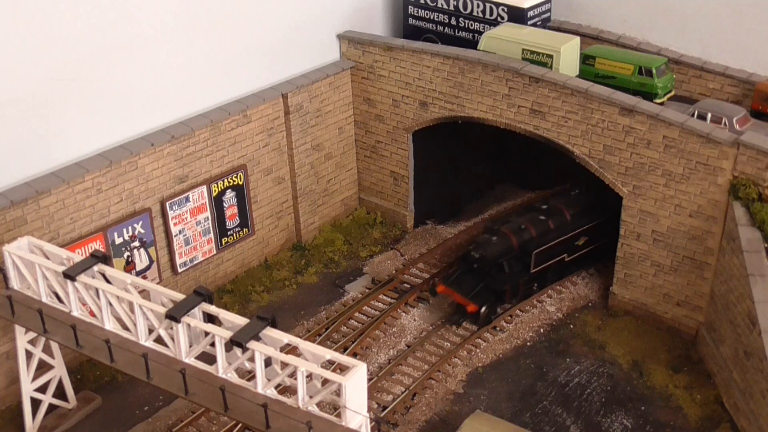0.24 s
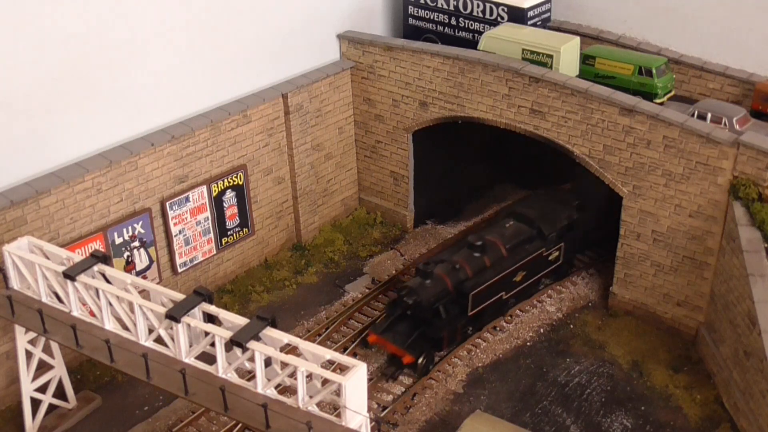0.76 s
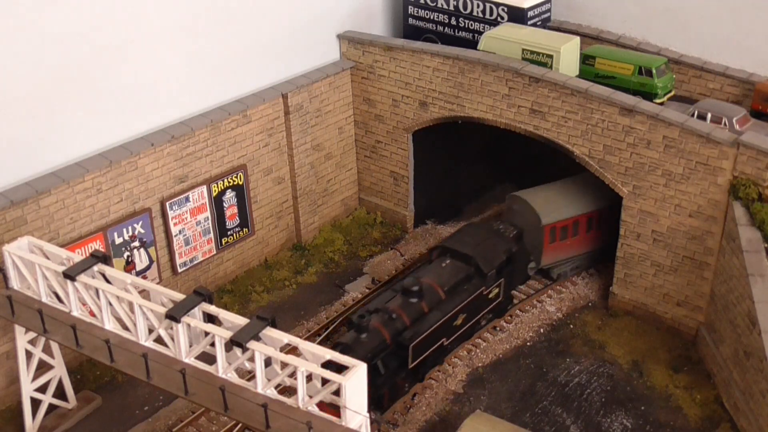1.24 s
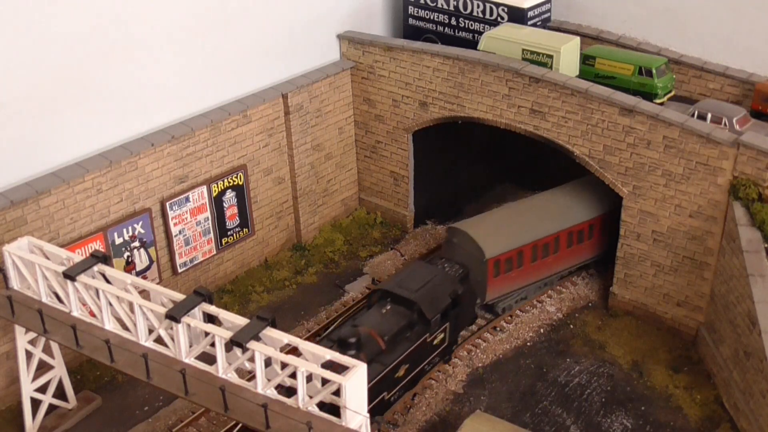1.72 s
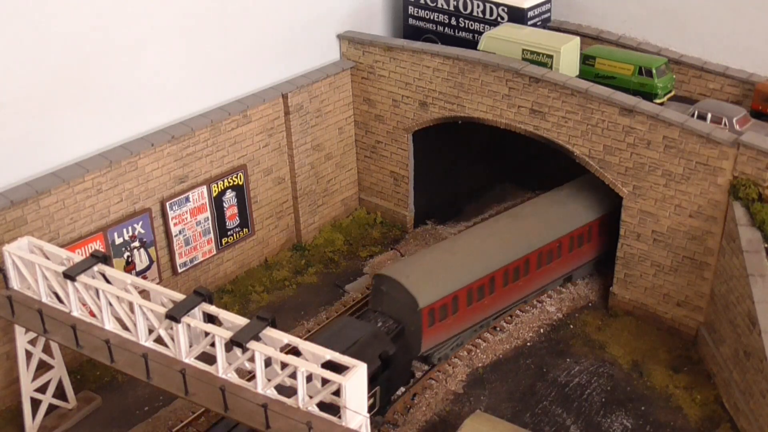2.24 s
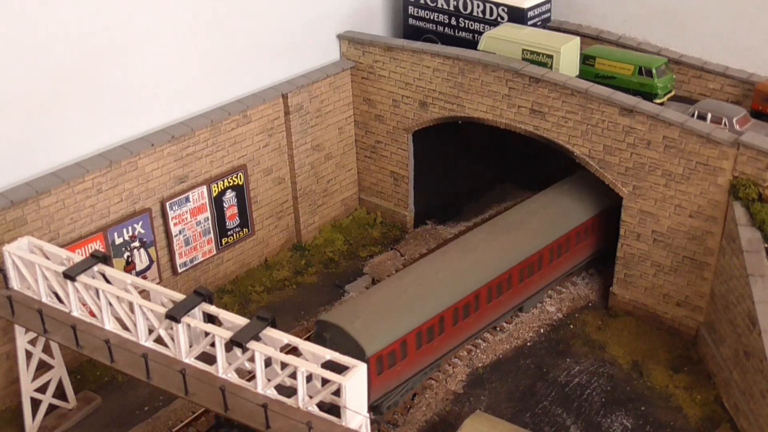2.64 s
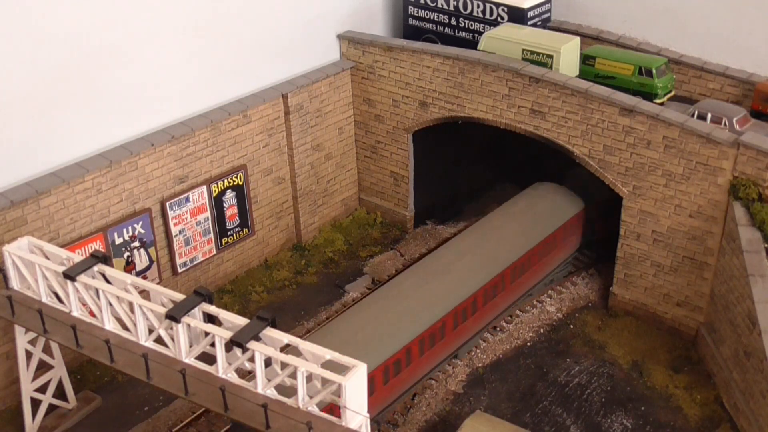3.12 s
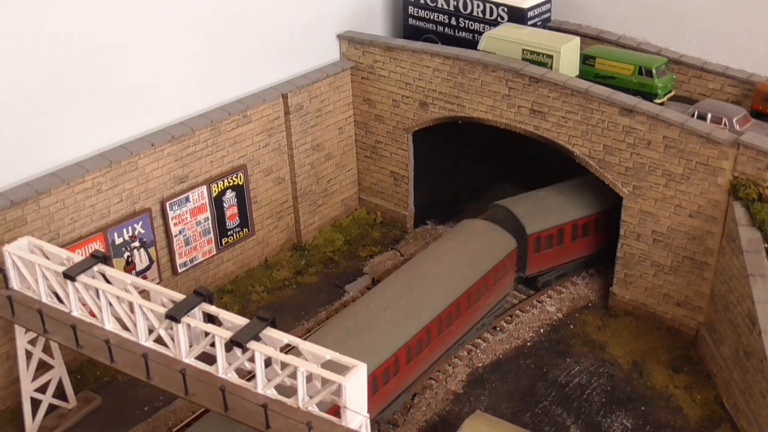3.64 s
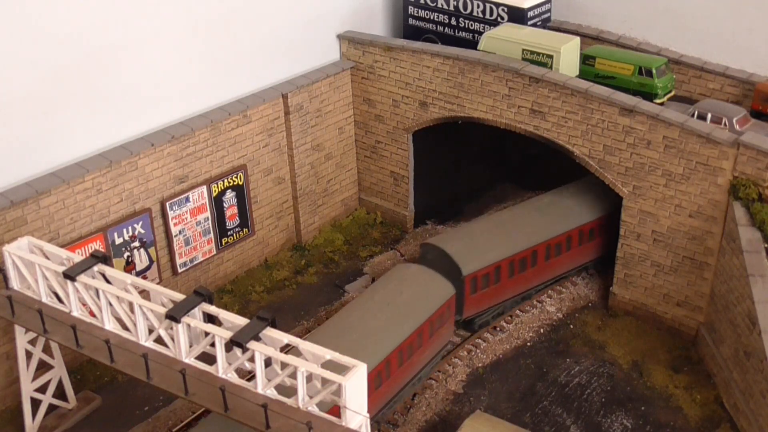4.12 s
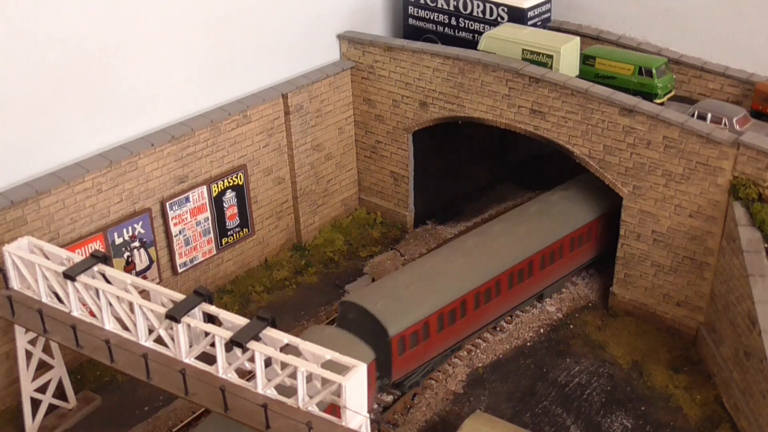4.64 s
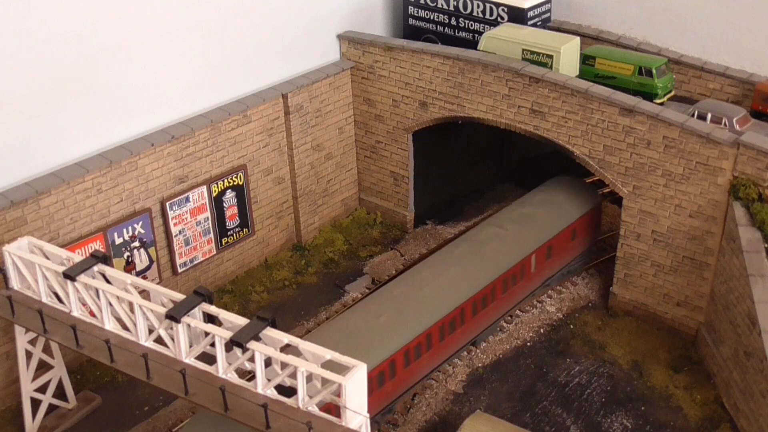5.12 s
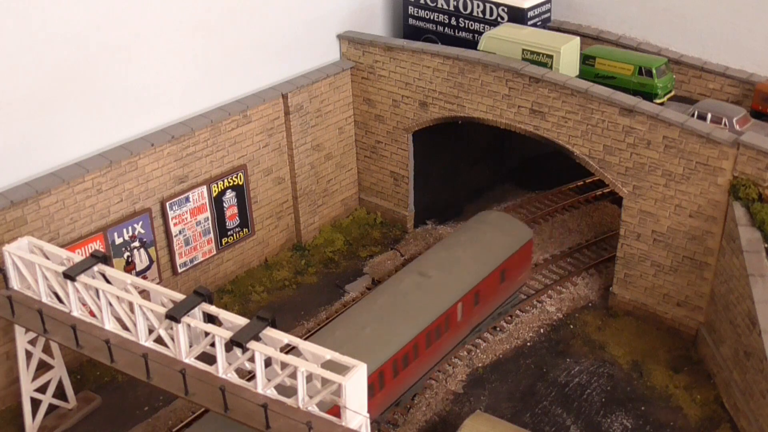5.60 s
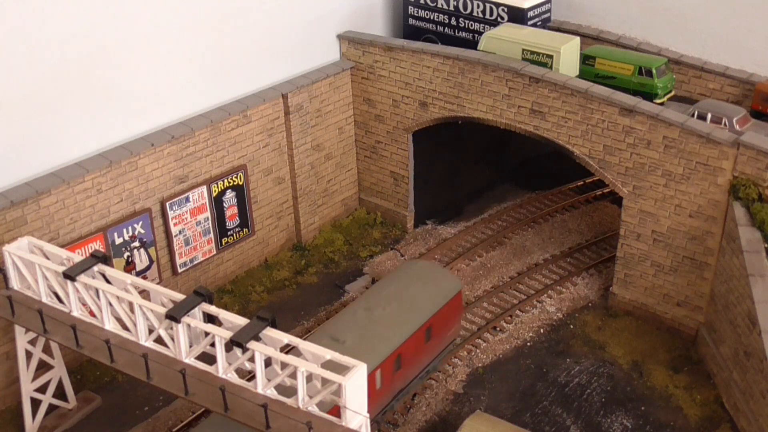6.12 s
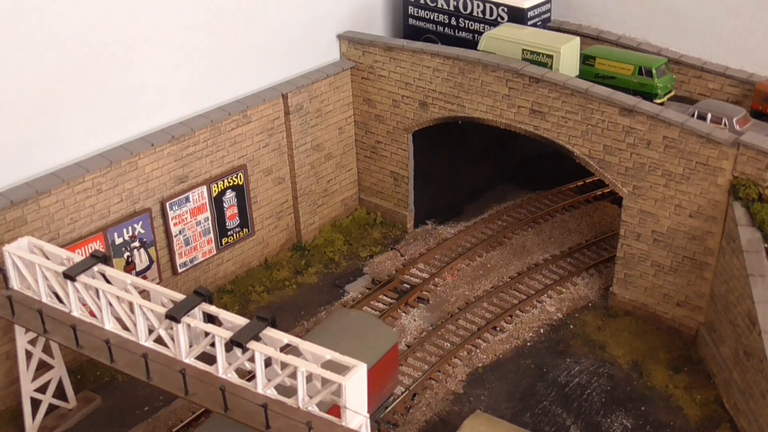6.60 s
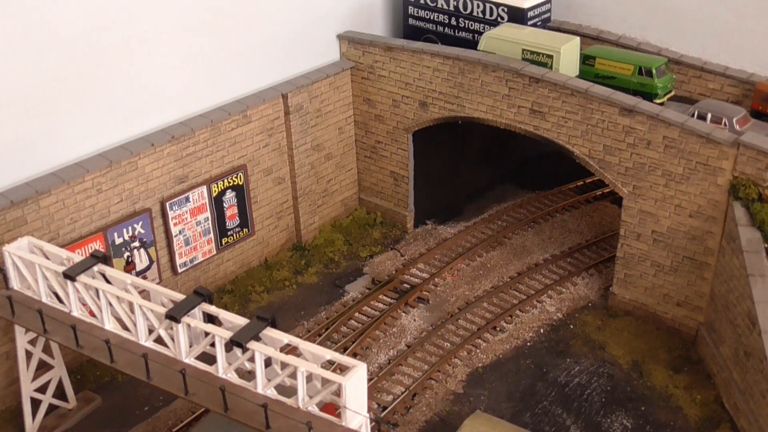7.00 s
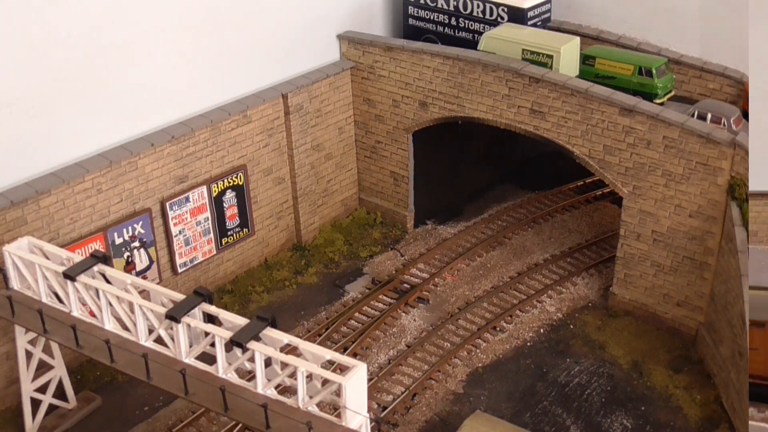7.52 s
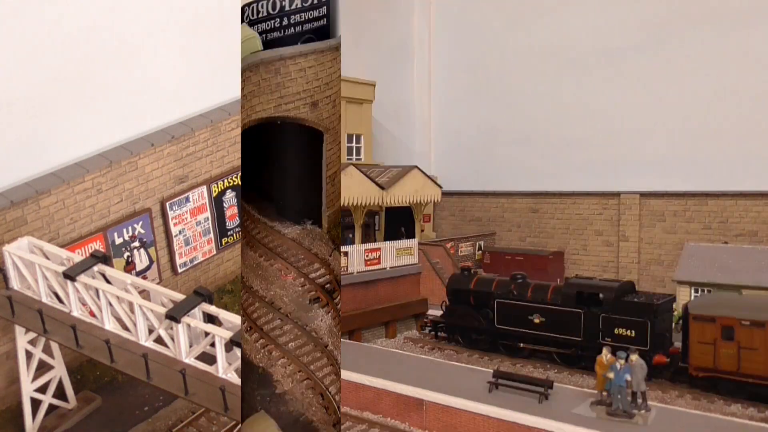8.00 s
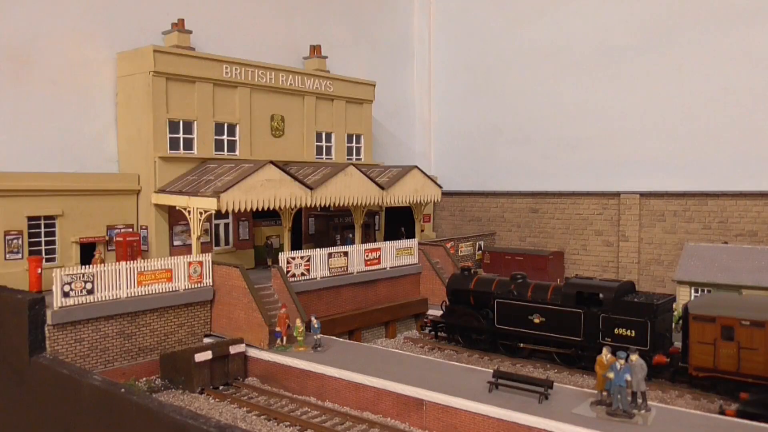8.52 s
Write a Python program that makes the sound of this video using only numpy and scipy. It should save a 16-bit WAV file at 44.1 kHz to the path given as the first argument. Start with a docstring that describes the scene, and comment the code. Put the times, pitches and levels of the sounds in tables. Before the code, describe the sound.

Close, dry sound of a miniature train on a hollow wooden layout. Wheels grit and hiss on the rails while the board hums and booms beneath. Clicks are few at first, then crowd into uneven rattling groups as the coaches roll by, strongest past the middle. The clatter continues after the train leaves view, then dissolves into a quiet room with soft electrical hum.

```python
"""A small electric model train rolls over points and rail joints, close to a camera microphone in a quiet room.
Rolling noise and blows drive damped baseboard modes, which boom; filtered noise, roughened by small
knocks and ringing parts, makes the rush and hiss of the wheels. Joints click as short noise bursts with
a brief note, narrow noise bands waver in the treble. At the end the scene crossfades into another
scene's quiet floor with a faint mains hum."""
import sys
import numpy as np
from scipy import signal
from scipy.fft import rfft, irfft, next_fast_len
from scipy.io import wavfile
from scipy.ndimage import uniform_filter1d

SR = 44100
rng = np.random.default_rng(int(sys.argv[2]) if len(sys.argv) > 2 else 0)


def wav_out(sig):
    """Save sig, one row per channel (or a flat mono array), as 16-bit PCM at SR to the path in sys.argv[1]."""
    wavfile.write(sys.argv[1], SR, np.round(np.clip(np.atleast_2d(sig).T, -1, 1) * 32767).astype(np.int16))


N = 385991

# Baseboard modes. Each row: frequency in Hz, relative level in dB, t60 in s under steady drive.
BOARD_MODES = [(74.5, -26, 0.46), (83.7, -14, 0.33), (110.3, -8.5, 0.22), (139, -38, 0.23),
               (162.8, -2.5, 0.25), (185.9, -2.5, 0.34), (197.3, -1, 0.44), (222.2, -6.5, 0.4),
               (235.7, -2, 0.59), (259.6, -1.5, 0.47), (289.2, -8.5, 0.56), (309.5, 1, 0.088),
               (363.7, -3.5, 0.76), (381.6, -4.5, 0.59), (460.6, -1, 0.36)]


def undb(db):
    """Decibels to gain."""
    return 10 ** (np.asarray(db, float) / 20)


def unit(x):
    """Scale to rms 1 over all channels."""
    return x / np.sqrt(np.mean(x ** 2))


def colour(x, table, share=1):
    """Filter by share of a (Hz, dB) table, joined by lines on a log frequency axis."""
    size = next_fast_len(N)
    hz, db = np.transpose(table)
    f = np.maximum(np.arange(size // 2 + 1) * SR / size, 1)
    gain = undb(share * np.interp(np.log(f), np.log(hz), db))
    return irfft(rfft(x, size) * gain, size)[..., :N]


def noise():
    """White noise for mid and an unrelated side."""
    return rng.standard_normal((2, N))


def walk(rate_hz):
    """Random levels held 1 / rate_hz and smoothed twice; spread near 1."""
    k = int(SR / rate_hz)
    steps = np.repeat(rng.standard_normal(N // k + 1), k)
    return 1.3 * uniform_filter1d(uniform_filter1d(steps, k), k)[:N]


def curve(t, table):
    """Columns of a table joined by straight lines in time."""
    s, *columns = np.transpose(table)
    return [np.interp(t, s, c) for c in columns]


def add(out, s, x):
    """Mix a short sound in at time s."""
    i = int(s * SR)
    out[:, i:i + x.shape[1]] += x[:, :N - i]


def mode(x, hz, t60_s):
    """One damped resonance; an impulse of 1 rings at amplitude 1."""
    pole = np.exp(2j * np.pi * hz / SR - np.log(1000) / (t60_s * SR))
    return signal.lfilter([1], [1, -pole], x).imag


def narrow(hz, width_hz):
    """Noise in one steep resonance whose centre may move: slow complex noise shifted up to hz."""
    pole = np.exp(-1.5 * np.pi * width_hz / SR)
    two_stages = [[1, 0, 0, 1, -2 * pole, pole ** 2]] * 2
    slow = signal.sosfilt(two_stages, noise() + 1j * noise())
    carrier = np.exp(2j * np.pi * np.cumsum(hz * np.ones(N)) / SR)
    return unit((slow * carrier).real)


def favour(hz, centre_hz):
    """Modes near the centre are driven hardest from a given place on the board."""
    spread_oct = 0.35
    return 0.4 + np.exp(-(np.log2(hz / centre_hz) / spread_oct) ** 2)


def board_boom(t, boom_db, centre_hz):
    """Rough rolling drives the baseboard modes; the deepest have a level of their own."""
    deep_below_hz = 125
    # Each row: time in s, level of the deepest modes in dB.
    deep_levels = [(0.0, -67), (0.29, -75), (0.51, -78), (2.33, -68), (3.17, -87), (4.3, -62), (4.78, -75),
                   (5.25, -67.5), (5.4, -69.5), (6.54, -71), (7.39, -65), (7.6, -79)]
    boom, deep = np.zeros((2, 2, N))
    for hz, db, t60_s in BOARD_MODES:
        ringing = undb(db + 1.9 * walk(5)) * unit(mode(noise(), hz, t60_s))
        if hz < deep_below_hz:
            deep += ringing
        else:
            boom += ringing * favour(hz, centre_hz)
    deep_db, = curve(t, deep_levels)
    return undb(boom_db) * unit(boom) + undb(deep_db) * unit(deep)


def rattle():
    """Gain that swells and dies within a few ms at random small knocks of couplings and axles."""
    knocks_per_s, least_db, scatter_db, swell_ms = 110, -3, 2.5, .9
    when, size = rng.random((int(knocks_per_s * N / SR), 2)).T
    hits = np.zeros(N)
    hits[(when * N).astype(int)] = undb(least_db + scatter_db * -np.log(1 - .98 * size))
    t = np.arange(SR // 50) / (SR * swell_ms / 1000)
    return signal.oaconvolve(hits, np.e * t * np.exp(-t))[:N]  # a lone swell peaks at its hit's size


def pings():
    """Loose small parts ring for a moment, each at its own pitch and place."""
    pings_per_s, t60_s, low_hz, high_hz, level_db = 420, .018, 500, 5200, -17
    out, t = np.zeros((2, N)), np.arange(SR // 40) / SR
    envelope = np.exp(-np.log(1000) * t / t60_s) * np.minimum(t * 1000, 1)
    for when, pitch, size, side in rng.random((int(pings_per_s * N / SR), 4)):
        hz = low_hz * (high_hz / low_hz) ** pitch
        ring = np.sin(2 * np.pi * hz * t) * envelope
        strength = -np.log(1 - .98 * size) * np.sqrt(hz)
        add(out, when * N / SR, strength * ring * np.array([[1], [2 * side - 1]]))
    return undb(level_db) * unit(out)


def unrest(clicks):
    """The stock rattles on for a while after a joint: smoothed click power as a gain, 1 when calm."""
    decay_ms, share = 10.8, 0.26
    keep = np.exp(-1000 / (decay_ms * SR))
    power = signal.lfilter([1], [1, -keep], clicks[0] ** 2)
    return 1 + share * np.sqrt(power / power.mean())


def bogies(db, shake, parts):
    """Bogie frames: the lower rolling noise, lightly roughened."""
    # Each row: frequency in Hz, relative density in dB per Hz.
    spectrum = [(250, -23.5), (340, -0.5), (460, 7), (680, 3), (850, -3), (1300, -6), (2000, -31.5)]
    rough = noise() * (1 + .3 * shake) + parts / 2
    return undb(db + .6 * walk(14)) * unit(colour(rough, spectrum))


def coaches(db, shaken, shake, parts):
    """Hollow coach bodies turn rolling noise into a rush."""
    # Each row: frequency in Hz, relative density in dB per Hz.
    spectrum = [(400, -26), (650, -8.5), (810, -1.5), (1010, -4), (1360, -4), (1550, -7.5), (1750, -18),
                (2600, -38)]
    rough = shaken * noise() * (1 + .4 * shake) + parts
    return undb(db + .8 * walk(8)) * unit(colour(rough, spectrum))


def treads(db, shaken, shake, parts):
    """Wheel treads grit on the rail, strongly roughened by the knocks."""
    # Each row: frequency in Hz, relative density in dB per Hz.
    spectrum = [(940, -40), (1600, -29), (1730, -8), (2110, -2.5), (2730, -10.5), (3440, -7.5),
                (4220, -8.5), (6200, -20), (8060, -18.5), (13600, -120)]
    rough = shaken * noise() * (1 + .8 * shake) + parts
    return undb(db + .8 * walk(9)) * unit(colour(rough, spectrum))


def rail_hiss(t, shaken, shake):
    """Metal on metal hisses with slow swells and sinks as the locomotive leaves."""
    start_db, swell_db, loco_leaves_s, sink_db_per_s = -69.5, .8, 4, 2
    # Each row: frequency in Hz, relative density in dB per Hz.
    spectrum = [(3410, -93), (5800, -47), (6460, -29), (7400, -12), (7650, 0), (8590, 13.5), (10600, 12),
                (14200, -5), (14700, -19), (15600, -65)]
    db = start_db + swell_db * walk(5.03) - sink_db_per_s * np.maximum(t - loco_leaves_s, 0)
    rough = shaken * noise() * (1 + .85 * shake)
    return undb(db + .8 * walk(9)) * unit(colour(rough, spectrum))


def treble_bands(t, scuff_db):
    """Thin rail tone, wheel rims, flange scuff and top hiss: noise bands wavering in pitch and level."""
    rim_start_db, rim_leaves_s, rim_sink_db_per_s = -79.5, 6.2, 9
    # Rail tone, rims, scuff, top hiss. Each row: mean centre in Hz, width in Hz.
    bands = [(7620, 130), (10600, 500), (5700, 1300), (13000, 2600)]
    # Each row: time in s, mean level of the rail tone in dB.
    rail_levels = [(0.0, -84), (0.98, -85), (1.16, -73), (1.57, -84), (2.4, -77), (3.09, -75), (3.78, -78),
                   (4.31, -71), (4.6, -73), (5.1, -81), (5.4, -95)]
    # Each row: time in s, mean level of the hiss near 13 kHz in dB.
    top_levels = [(0, -91), (1.5, -84), (2.6, -77), (3.4, -77), (5, -88)]
    rim_db = rim_start_db - rim_sink_db_per_s * np.maximum(t - rim_leaves_s, 0)
    levels_db = curve(t, rail_levels)[0], rim_db, scuff_db, curve(t, top_levels)[0]
    out = np.zeros((2, N))
    for db, (hz, width_hz) in zip(levels_db, bands):
        gain = undb(db + 2 * walk(25) + 1.5 * walk(4))
        out += gain * narrow(hz + .25 * width_hz * walk(3), width_hz)
    return out


def sizzle(t):
    """A band of noise near 8 kHz, wavering in pitch and level."""
    centre_hz, waver_hz, width_hz = 8000, 120, 600
    # Each row: time in s, mean level in dB.
    levels = [(0, -90), (.3, -86), (.4, -74), (.68, -74), (.8, -77), (1.07, -73), (1.9, -87), (2.5, -74),
              (3.06, -72), (3.66, -83), (4.2, -69.5), (4.7, -80), (5.3, -73), (5.9, -78), (6.5, -95)]
    db, = curve(t, levels)
    return undb(db + 2 * walk(25)) * narrow(centre_hz + waver_hz * walk(3), width_hz)


def room(t):
    """Steady room and microphone noise; the scene that is crossfaded in at the end adds its mains hum."""
    level_db, crossfade_s = -65, (7.6, 8.6)
    # Each row: frequency in Hz, relative density in dB per Hz.
    spectrum = [(20, -32.5), (55, -17), (85, -15), (119, -10.5), (202, -2.5), (260, -6.5), (453, -10),
                (1200, -20), (2280, -35), (4500, -37.5), (6040, -49), (7900, -36.5), (13500, -42),
                (15600, -47)]
    # Mains multiples in the last scene. Each row: frequency in Hz, rms level in dB after the crossfade.
    hum_tones = [(100, -74.5), (150.7, -72.5), (199.2, -68.5), (446.8, -78.5)]
    hum = np.zeros(N)
    for hz, db in hum_tones:
        hum += np.sqrt(2) * undb(db) * np.sin(2 * np.pi * (hz * t + rng.random()))
    return undb(level_db) * unit(colour(noise(), spectrum)) + hum * np.interp(t, crossfade_s, (0, 1))


def thud(db, centre_hz):
    """A blow sets the modes ringing nearly in step; it swells for a cycle and dies faster than the boom."""
    t = np.arange(SR // 5) / SR
    hz, mode_db, t60_s = np.array(BOARD_MODES).T[:, :, None]
    phase = 2.2 * rng.random((2, len(BOARD_MODES), 1))
    decay = np.exp(-np.log(1000) * t / (0.29 * t60_s))
    strength = undb(mode_db) * favour(hz, centre_hz) ** 2
    rings = strength * decay * np.sin(2 * np.pi * hz * t + phase)
    x = (1 - np.exp(-(t / 0.0048) ** 2)) * rings.sum(axis=1)
    return undb(db) * x / np.abs(x[0]).max()


def thuds():
    """Wheels dropping into gaps, felt through the board."""
    # Each row: start in s, peak level in dB, favoured frequency in Hz.
    blows = [(0.056, -45.5, 189), (0.325, -39.5, 215), (0.465, -39, 232), (0.549, -43, 208),
             (0.591, -42.5, 232), (0.642, -42, 235), (1.236, -38.5, 235), (2.407, -31.5, 248),
             (2.651, -31.5, 220), (3.655, -39.5, 187), (4.382, -36, 270), (4.401, -37, 278),
             (4.634, -37, 222), (5.271, -38, 178), (6.147, -35.5, 174), (7.209, -37, 174),
             (7.679, -38, 217), (8.153, -51, 190)]
    out = np.zeros((2, N))
    for s, db, hz in blows:
        add(out, s, thud(db, hz))
    return out


def burst(hz, width, decay_ms, echo_db, echo_ms, pitched):
    """A hard contact and a crack of noise round hz, with a fainter, longer echo and a short note."""
    rise_ms, contact_ms, contact_strength, peak = .55, .5, 1.76, 1.12
    ms = np.arange(SR // 16) / SR * 1000
    rise = 1 - np.exp(-(ms / rise_ms) ** 2)
    push = rng.standard_normal((2, len(ms)))
    push *= rise * (np.exp(-ms / decay_ms) + undb(echo_db) * np.exp(-ms / echo_ms))
    push[:, int(contact_ms * SR / 1000)] += contact_strength * np.sqrt(SR / hz)
    edges_hz = np.clip([hz / (1 + width), hz * (1 + width)], 50, .45 * SR)
    crack = signal.sosfilt(signal.butter(3, edges_hz, "band", fs=SR, output="sos"), push)
    note = mode(push, hz, np.log(1000) * decay_ms / 1000)
    both = crack / np.abs(crack[0]).max() + pitched * note / np.abs(note[0]).max()
    return peak * both / np.abs(both[0]).max()


def click(ring_db, knock_db, tick_db, ring_hz, knock_hz, tick_hz):
    """Plastic body knocks, wheel rings briefly, metal edge ticks."""
    # width as share of pitch, decay in ms, echo in dB, echo decay in ms, share of clear note
    knock = burst(knock_hz, .35, 3.2, -12, 12, .5)
    ring = burst(ring_hz, .7, 1.6, -16, 8, .35)
    tick = burst(tick_hz, .33, 1.3, -19, 7, .45)
    return undb(knock_db) * knock + undb(ring_db) * ring + undb(tick_db) * tick


def joints():
    """Distinct clicks of wheels at joints and points; the edge ticks at a random pitch each time."""
    tick_low_hz, tick_high_hz = 7600, 10400
    # Each row: start in s, relative levels of ring, body knock and tick in dB, ring in Hz, knock in Hz.
    clicks = [(0.1054, -54, -68, -53, 3540, 780), (0.37, -53, -58, -55, 1990, 690),
              (0.479, -53, -55, -54, 3560, 690), (0.827, -50, -56, -56, 2930, 1430),
              (1.057, -39, -36, -42, 2420, 1380), (1.1005, -51, -46, -43, 4170, 1020),
              (1.1992, -54, -50, -52, 2100, 790), (1.2398, -53, -48, -51, 1850, 1370),
              (1.362, -50, -40, -41, 2520, 1370), (1.383, -46, -42, -39, 2260, 1020),
              (1.526, -58, -55, -47, 1850, 690), (1.8315, -39, -38, -43, 1970, 1370),
              (1.909, -48, -48, -46, 2390, 1030), (1.919, -49, -46, -42, 4180, 1080),
              (1.9267, -46, -50, -54, 3460, 760), (2.156, -44, -44, -47, 3510, 990),
              (2.2065, -40, -37, -41, 2850, 1400), (2.212, -42, -47, -38, 2290, 1350),
              (2.225, -45, -46, -49, 2140, 1090), (2.2865, -51, -48, -48, 4490, 1060),
              (2.3867, -55, -62, -50, 3320, 1360), (2.4014, -47, -47, -47, 2210, 740),
              (2.4096, -47, -50, -49, 4380, 690), (2.6104, -49, -47, -41, 4120, 840),
              (2.646, -48, -38, -40, 3150, 980), (2.6526, -48, -43, -49, 3590, 690),
              (2.9445, -46, -44, -54, 1900, 1050), (2.9475, -37, -48, -44, 2010, 1110),
              (2.9624, -46, -41, -41, 3130, 1010), (3.032, -46, -47, -54, 3450, 930),
              (3.089, -49, -42, -47, 3380, 560), (3.366, -42, -38, -49, 3270, 1350),
              (3.3729, -41, -38, -51, 3760, 1130), (3.652, -42, -59, -48, 3050, 690),
              (3.665, -40, -36, -47, 3490, 900), (3.868, -46, -46, -58, 2140, 1000),
              (4.044, -42, -43, -56, 3320, 740), (4.089, -50, -44, -53, 2020, 1370),
              (4.172, -44, -48, -57, 2310, 1170), (4.358, -47, -45, -48, 4490, 1060),
              (4.379, -44, -49, -46, 3750, 1010), (4.401, -45, -43, -51, 2070, 1400),
              (4.48, -48, -41, -44, 4110, 560), (4.551, -40, -58, -46, 2290, 1060),
              (4.6325, -57, -46, -51, 2960, 760), (4.635, -52, -41, -58, 2400, 450),
              (4.7425, -36, -35, -44, 1850, 1010), (4.766, -44, -44, -55, 2090, 740),
              (4.786, -43, -46, -48, 2970, 1130), (4.809, -44, -42, -37, 1880, 760),
              (4.9003, -42, -54, -45, 2060, 790), (4.956, -43, -38, -52, 2000, 1070),
              (5.033, -44, -35, -43, 1850, 1150), (5.0391, -46, -40, -55, 3520, 950),
              (5.0705, -40, -41, -43, 3910, 1380), (5.102, -46, -39, -39, 4400, 1120),
              (5.1085, -39, -37, -37, 3400, 1410), (5.239, -46, -40, -55, 2560, 1120),
              (5.298, -45, -47, -48, 2030, 1230), (5.369, -45, -47, -60, 1990, 810),
              (5.43, -45, -43, -54, 4270, 790), (5.48, -40, -39, -43, 4260, 720),
              (5.5755, -42, -43, -54, 2030, 810), (5.688, -40, -52, -45, 3620, 1360),
              (5.7545, -43, -40, -44, 3450, 960), (5.7605, -52, -41, -53, 3850, 760),
              (5.8663, -49, -43, -62, 2060, 1270), (5.922, -47, -42, -53, 4230, 940),
              (6.09, -43, -46, -54, 3280, 1310), (6.104, -44, -38, -39, 3050, 1090),
              (6.1447, -41, -44, -49, 2110, 1440), (6.2564, -55, -43, -62, 1820, 830),
              (6.3845, -45, -53, -49, 4060, 860), (6.4167, -42, -45, -41, 2980, 1080),
              (6.4233, -40, -38, -43, 3770, 1390), (6.4356, -48, -41, -58, 3640, 1310),
              (6.4494, -43, -44, -51, 3230, 1210), (6.4599, -45, -43, -58, 2380, 1030),
              (6.4975, -50, -43, -58, 4220, 790), (6.575, -48, -47, -52, 1890, 810),
              (6.8195, -49, -46, -56, 3420, 800), (6.8475, -45, -39, -48, 1850, 870),
              (6.8528, -41, -41, -45, 1850, 860), (6.889, -44, -38, -51, 2110, 780),
              (7.027, -49, -44, -51, 2010, 1370), (7.08, -50, -52, -48, 3340, 760),
              (7.1624, -40, -37, -42, 3560, 870), (7.1995, -46, -42, -54, 2280, 810),
              (7.2037, -42, -42, -45, 3790, 1210), (7.214, -48, -57, -53, 4240, 1270),
              (7.255, -47, -46, -56, 3900, 800), (7.281, -49, -43, -60, 2270, 1380),
              (7.38, -45, -47, -46, 2350, 1120), (7.441, -43, -40, -50, 2140, 1210),
              (7.515, -42, -49, -50, 3280, 940), (7.5494, -48, -47, -56, 2030, 850),
              (7.5794, -50, -47, -54, 3600, 820), (7.737, -44, -45, -58, 2060, 1070),
              (7.858, -45, -46, -52, 2990, 1340), (7.9089, -49, -52, -56, 2600, 1040),
              (8.07, -52, -54, -63, 3200, 1360), (8.082, -53, -56, -62, 3750, 1030),
              (8.292, -62, -54, -70, 2020, 830), (8.354, -56, -61, -65, 2600, 990),
              (8.5195, -57, -64, -69, 2400, 1200)]
    out = np.zeros((2, N))
    for s, *sound in clicks:
        add(out, s, click(*sound, rng.uniform(tick_low_hz, tick_high_hz)))
    return out * [[1], [0.55]]  # a click comes from one spot, so less of it lies in the side


def train(t):
    """Bogies, treads and flanges follow the coach level; the crossfade takes the rolling out at the end."""
    crossfade_s, silent_s, bend = 7.6, 8.65, 1.32
    full_coach_db, mean_boom_db = -55, -46.5
    # Load on the baseboard. Each row: time in s, boom level in dB, favoured frequency in Hz.
    board_load = [(0.0, -53.5, 192), (0.36, -51, 213), (0.95, -51.5, 232), (1.29, -49, 222),
                  (1.67, -54.5, 217), (2.03, -49.5, 212), (2.07, -54, 252), (2.39, -49.5, 250),
                  (2.58, -47.5, 255), (2.67, -46, 230), (2.94, -49.5, 257), (3.12, -49, 234),
                  (3.25, -47, 239), (3.4, -49.5, 237), (3.6, -49, 224), (4.15, -51.5, 250),
                  (4.44, -48.5, 263), (4.89, -49.5, 234), (5.5, -49, 234), (6.67, -56.5, 227),
                  (7.32, -49, 225), (7.37, -50, 249), (7.6, -53, 220)]
    # Nearness of the coaches. Each row: time in s, mean rush level in dB.
    nearness = [(0.0, -65), (0.21, -67), (1.37, -57.5), (1.67, -60.5), (3.51, -54.5), (3.92, -54),
                (4.85, -53.5), (5.35, -53), (5.65, -51.5), (6.71, -56), (7.26, -53), (7.6, -54.5)]
    boom_db, centre_hz = curve(t, board_load)
    coach_db, = curve(t, nearness)
    rise_db = coach_db - full_coach_db
    bogie_db = -52.5 + 0.25 * rise_db + 0.55 * (boom_db - mean_boom_db)
    tread_db = -61 + 0.48 * rise_db
    scuff_db = -85 + 3.1 * rise_db

    clicks = joints()
    shaken = unrest(clicks)
    shake, parts = rattle() * shaken, pings()
    rolling = board_boom(t, boom_db, centre_hz)
    rolling += bogies(bogie_db, shake, parts)
    rolling += coaches(coach_db, shaken, shake, parts)
    rolling += treads(tread_db, shaken, shake, parts)
    rolling += rail_hiss(t, shaken, shake)
    rolling += treble_bands(t, scuff_db) + sizzle(t)
    fade_out = np.clip((silent_s - t) / (silent_s - crossfade_s), 0, 1) ** bend
    return fade_out * rolling + thuds() + clicks


def scene():
    """Sources in mid and side, spread by the width, lean and delay of the microphone pair."""
    left_leads_us = 18  # the train is a little nearer the left port
    # Bass cut, top fall and a dip of the camera body. Each row: frequency in Hz, gain in dB.
    mic = [(40, -48), (80, 2.5), (4500, -7), (6000, -8.5), (7500, -4.5), (13000, -4), (15600, -9)]
    # Stereo width. Each row: frequency in Hz, gain of the side in dB.
    width = [(30, 13), (60, -29), (110, -16), (200, -19.5), (380, -12), (700, -8.5), (1290, -7.5),
             (2380, -7.5), (4400, -6), (8120, -6.5), (15000, 0.5)]
    # Channel balance. Each row: frequency in Hz, left minus right gain in dB.
    lean = [(40, -5), (130, 2.5), (500, -1.5), (1200, 0.9), (8000, 1.1), (13000, -1)]
    t = np.arange(N) / SR
    mid, side = colour(train(t), mic) + room(t)
    # half the lead as slope times time, opposite in sign for the two channels
    side = colour(side, width) + np.gradient(mid) * left_leads_us * 1e-6 * SR / 2
    return np.array([colour(mid + side, lean, 1 / 2), colour(mid - side, lean, -1 / 2)])


def record(dry):
    """The recorder cuts the top steeply."""
    top_hz = 15570
    return signal.sosfilt(signal.ellip(10, .2, 80, top_hz, fs=SR, output="sos"), dry)


dry = scene()
out = record(dry)
wav_out(out)
```